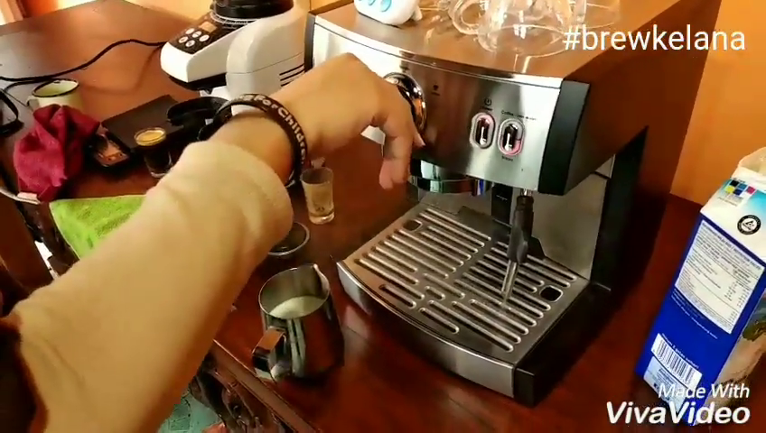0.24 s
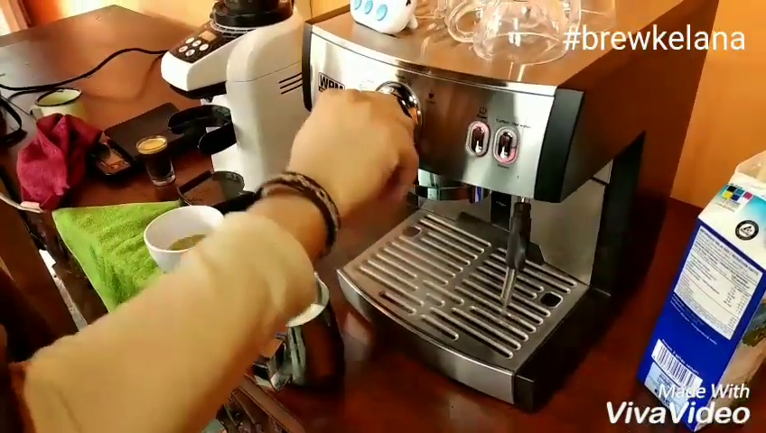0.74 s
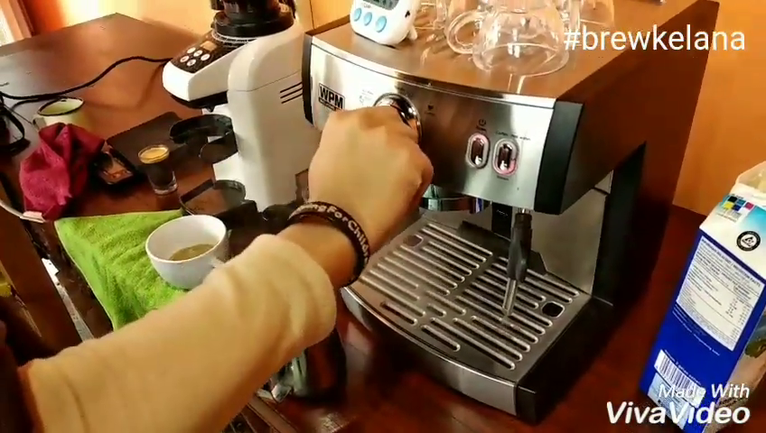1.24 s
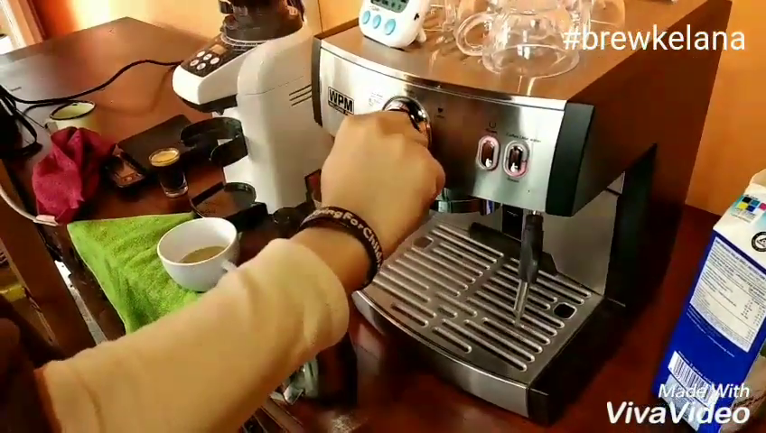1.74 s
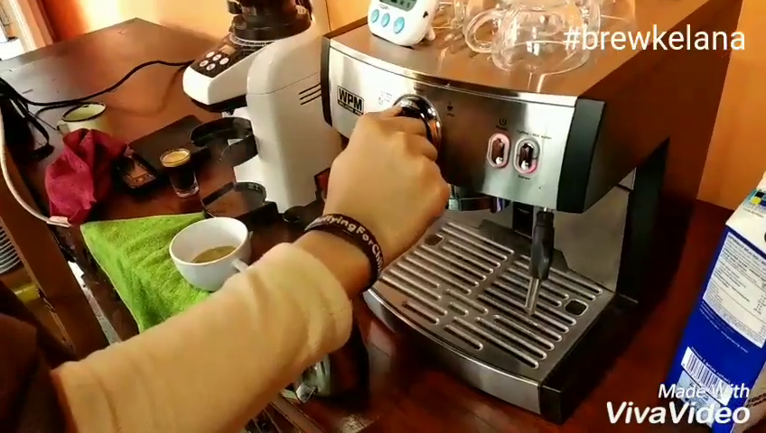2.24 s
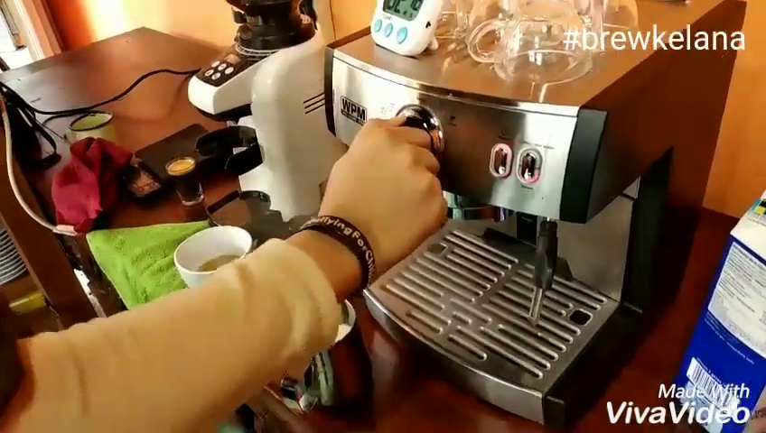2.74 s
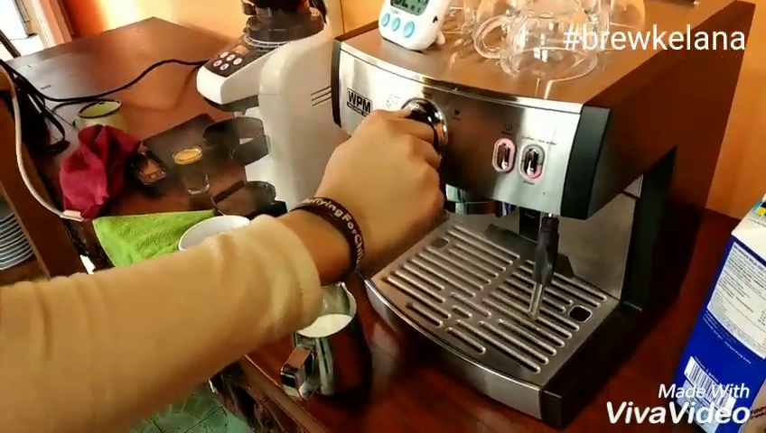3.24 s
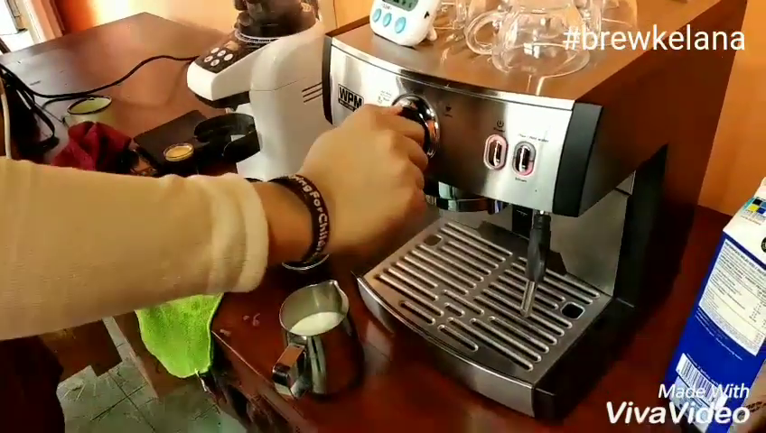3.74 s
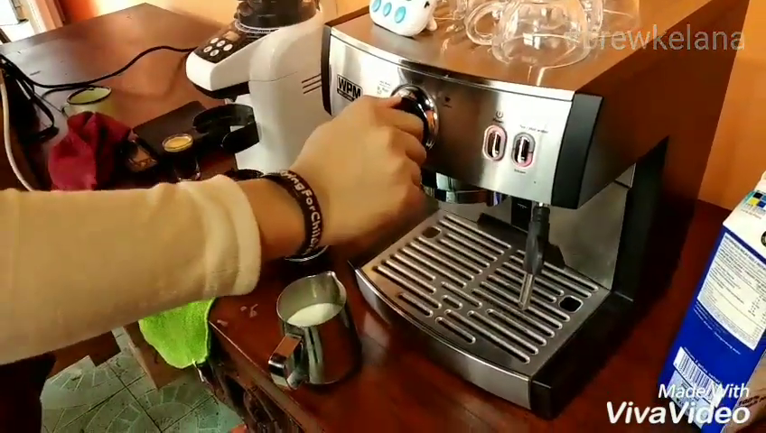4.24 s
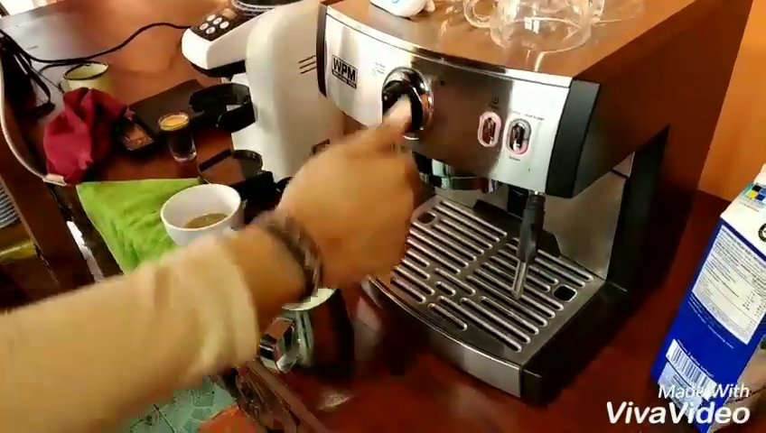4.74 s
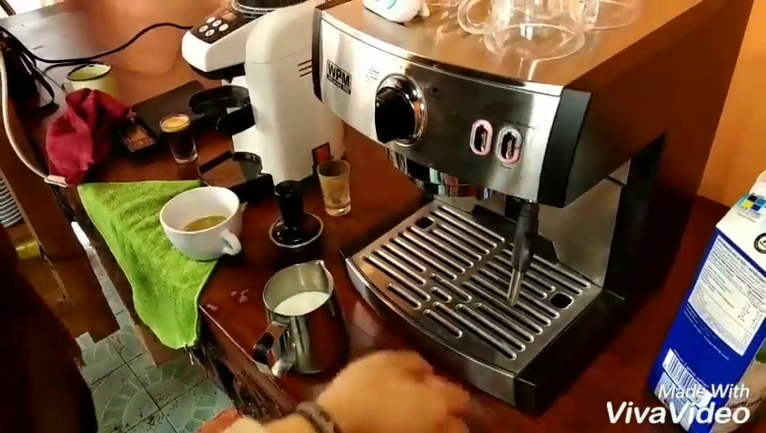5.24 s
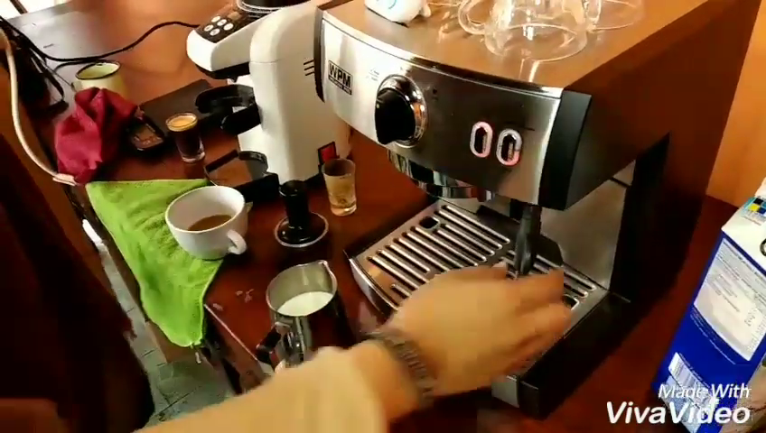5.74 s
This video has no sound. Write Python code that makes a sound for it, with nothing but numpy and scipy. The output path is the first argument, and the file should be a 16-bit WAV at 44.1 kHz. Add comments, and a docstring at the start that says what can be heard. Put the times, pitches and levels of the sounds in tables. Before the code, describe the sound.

Close stereo pickup in a small room: an espresso machine is already hissing loudly, dry and bright, over a low pulsing hum. A faint double knock comes before the knob turns and the hiss drops. A fuller jet bursts in with spluttering water, clears to rushing steam, and fades quickly. The hum runs down, leaving soft room noise and dull low rumbles.

```python
"""Small room: an espresso machine blows off steam over the low hum of a distant engine. A dry, bright jet of
flickering noise hisses until the knob turns at 2 s; a fuller jet then splutters with water, clears and dies
away as the pressure falls. The hum, harmonics of a slow beat, runs down into dull noise. Shaped room noise and
soft low rumbles, sliding tones mixed with rough noise, remain."""
import sys
import numpy as np
from scipy import signal
from scipy.fft import rfft, irfft, next_fast_len
from scipy.io import wavfile
from scipy.ndimage import uniform_filter1d

SR = 44100
rng = np.random.default_rng(int(sys.argv[2]) if len(sys.argv) > 2 else 0)


def store_pcm(level_fs):
    """Save levels as 16-bit WAV."""
    pcm = np.round(np.clip(level_fs, -1, 1) * 32767).astype(np.int16)
    wavfile.write(sys.argv[1], SR, np.atleast_2d(pcm).T)


N = 263739
TIME = np.arange(N) / SR
HZ = np.maximum(np.arange(N // 2 + 1) * SR / N, 1)

# Room noise: (frequency [Hz], relative density [dB/Hz])
ROOM_SPECTRUM = [(30, -12), (70, -17), (150, -22), (290, -22), (345, -24), (410, -12.5), (700, -11),
                 (1400, -13), (2080, -9), (2600, -14), (4600, -24.5), (6500, -27.5), (9000, -24.5),
                 (12500, -35), (15000, -40)]
# Faint room resonances: (frequency [Hz], width [Hz], height [dB], left minus right [dB])
ROOM_RESONANCES = [(410, 43, 7.5, 2), (1750, 1600, -2.5, 6), (2060, 110, 2, 8)]
# Default likeness of noise at the two ears: (frequency [Hz], correlation [-1..1])
EAR_LIKENESS = [(60, .93), (400, .93), (950, .88), (1500, .55), (2700, .6), (4000, .45), (6000, .2),
                (10000, .05)]
# Hum harmonics: (multiple of the beat [1], level [dB])
HUM_HARMONICS = [(2, -4), (3, -1.5), (4, -3), (5, 2), (6, -0.5), (7, -6), (8, -19), (11, -13)]
# Passing swells of single harmonics: (start [s], length [s], multiple [1], rise [dB])
HUM_SWELLS = [(-.1, 0.83, 4, 9.5), (-.1, 0.56, 7, 6.5), (-.1, 0.82, 11, 5), (1.17, 0.24, 5, 4.5),
              (1.58, 0.33, 5, 5.5), (1.88, 0.11, 6, 12), (2.702, 0.18, 2, 11.5), (3.032, 0.16, 5, 5)]
# Rumble under the hum: (frequency [Hz], relative density [dB/Hz])
RUMBLE_SPECTRUM = [(20, -24), (40, -11), (70, -5.5), (130, 4.5), (200, -3.5), (270, -7), (400, -14.5),
                   (800, -70)]
# Dry jet, broad: (frequency [Hz], relative density [dB/Hz])
DRY_SPECTRUM = [(40, -36), (120, -5.5), (300, -13.5), (380, -16), (520, -30), (1300, -12), (1800, -6),
                (3000, 1), (4700, -5), (6500, -4), (8800, -0.5), (12000, -4.5), (15000, -6.5)]
# Nozzle and surrounding steel: (frequency [Hz], width [Hz], height [dB], left minus right [dB])
DRY_RESONANCES = [(756, 56, 9, 1), (986, 150, 8, 0), (1328, 110, -3, -12), (1487, 64, -6.5, -15),
                  (1625, 830, 0.9, 11), (1706, 250, 5.5, -6), (2100, 200, 3, -6), (2435, 310, 2.5, 10),
                  (2730, 117, -6.5, -5), (3036, 110, -8, 8), (4160, 530, 5, 3), (4560, 1000, -3.5, 4.5),
                  (5060, 200, 7, -9), (5440, 620, -0.4, 7), (6400, 710, 2.5, -9.5), (6420, 210, -7, 11),
                  (7050, 310, 1, 14), (7200, 200, -8, -2), (7960, 1660, 2.5, -5.2)]
# Dry jet at the two ears, negative = opposite phase: (frequency [Hz], correlation [-1..1])
DRY_LIKENESS = [(400, .9), (1000, .75), (1400, -.1), (1650, .55), (1850, -.15), (2080, .6), (2280, .35),
                (2550, .92), (2850, .85), (3450, -.1), (4000, -.45), (4350, .2), (4800, -.3), (5950, .35),
                (6850, -.35), (7200, 0)]
# Hollows in the middle of the dry jet: (frequency [Hz], width [Hz], height [dB])
DRY_HOLLOWS = [(3480, 130, -8), (4770, 150, -7)]
# Bumps on the knob: (time [s], level [dB])
KNOCKS = [(1.371, -43), (1.39, -37.5)]
# Casing modes: (frequency [Hz], relative level [dB], t60 [s])
CASING_MODES = [(780, -3, 0.16), (970, 5, 0.12)]
# Clear blow-off, broad: (frequency [Hz], relative density [dB/Hz])
BLOW_SPECTRUM = [(40, -60), (120, -26), (300, -28.5), (550, -30.5), (900, -0.5), (1700, -17), (3000, -8.5),
                 (6000, 1), (9000, -14.5), (10900, -10.5), (12200, -30), (15000, -33)]
# Outlet and drip tray: (frequency [Hz], width [Hz], height [dB], left minus right [dB])
BLOW_RESONANCES = [(426, 84, 8, -11), (862, 157, -18, -12), (1106, 165, -13, -8), (1380, 200, -2, 5),
                   (1540, 71, -11, -16), (1671, 334, 12.5, 5.5), (2080, 295, 8, 6), (2630, 160, 1.5, -3),
                   (2835, 130, 6, 11), (2920, 300, -6.5, 5), (4174, 470, -9.5, 4), (4230, 470, 2.5, 0.5),
                   (4400, 91, 4, 4.5), (5144, 480, -10.5, -1), (5760, 410, -7.5, -1), (6150, 340, -2.5, 3),
                   (6580, 810, -11.5, -4), (6800, 234, -13, 0.6), (7140, 740, -3, -15), (7660, 370, -8, -8),
                   (8700, 400, 4.5, -12), (9740, 250, 4.5, -8)]
# Blow-off at the two ears, negative = opposite phase: (frequency [Hz], correlation [-1..1])
BLOW_LIKENESS = [(400, .85), (980, .85), (1300, -.4), (1600, .15), (1880, -.3), (2150, .65), (2450, .15),
                 (3150, 0), (3470, -.7), (3680, .1), (3900, -.8), (4060, -.98), (4300, -.1), (5200, -.3),
                 (6300, .1), (6650, -.45), (7000, .2), (9000, .05)]
# Hollows in the middle of the clear blow-off: (frequency [Hz], width [Hz], height [dB])
BLOW_HOLLOWS = [(3450, 90, -5), (4050, 150, -11), (5200, 140, -5), (6730, 180, -6)]
# Wet jet, broad: (frequency [Hz], relative density [dB/Hz])
WET_SPECTRUM = [(100, -27), (300, -22), (750, -2), (1200, -7), (2200, -3), (3000, 3), (4000, -3),
                (4900, -27), (6600, 5.5), (8000, 9), (10500, 8.5), (12200, -0.5), (15000, -3.5)]
# Outlet carrying water: (frequency [Hz], width [Hz], height [dB], left minus right [dB])
WET_RESONANCES = [(2200, 120, 9.5, 5), (2610, 230, -16, 8), (2950, 190, 6.5, 4), (3860, 190, -18, 0)]
# Last weak steam, no longer ringing the metal: (frequency [Hz], relative density [dB/Hz])
WEAK_SPECTRUM = [(300, -20), (700, 3.5), (1300, -2), (2100, 6), (4500, 0), (5600, -9), (9000, 1),
                 (11000, -20), (12500, -7), (15000, -15)]
# Spluttering water: (frequency [Hz], relative density [dB/Hz])
SPLUTTER_SPECTRUM = [(60, -32), (160, -2), (250, -3), (330, 4.5), (520, -8), (730, 4), (1100, -30),
                     (3000, -27), (15000, -62)]
# Water gurgling in the steam: (start [s], length [s], centre [Hz], half-width [octaves], initial level [dB])
GURGLES = [(2.283, 0.06, 300, 0.5, -31), (2.39, 0.047, 340, 0.24, -31), (2.525, .04, 520, .5, -34.5),
           (2.85, 0.045, 435, 0.17, -36)]
# Soft low rumbles: (start [s], length [s], first pitch [Hz], last pitch [Hz], initial level [dB])
LOW_RUMBLES = [(4.796, .022, 215, 200, -40), (4.869, 0.03, 115, 105, -37), (4.905, 0.044, 110, 100, -36.5),
               (4.956, .025, 129, 130, -40), (4.986, 0.062, 139.5, 144, -46),
               (5.063, 0.052, 151.5, 164, -41), (5.145, 0.057, 169, 136, -46.5),
               (5.318, 0.037, 135.7, 120, -36.5), (5.35, 0.042, 175, 155, -40.5),
               (5.409, 0.021, 96.7, 95, -37), (5.435, 0.023, 107.4, 121, -33),
               (5.464, 0.06, 128.9, 122, -40), (5.62, .018, 222, 220, -50), (5.661, 0.053, 194, 205, -46),
               (5.689, 0.041, 140, 100, -44), (5.803, 0.07, 131, 123, -43), (5.878, 0.085, 122.5, 120, -38),
               (5.938, 0.067, 128.7, 122, -33)]

# Stereo and top end: bass lags at the right ear, treble is scattered
RIGHT_LAG_S, LAG_FADES_HZ, CUTOFF_HZ = 0.0001, 1600, 15250
ROOM_DB = -49
# Hum: fades slowly, then slows, swells and roughens
HUM_BEAT_HZ, HUM_DB, HUM_FADE_DB_PER_S, HUM_SWELL_EDGE_S = 32.47, -38.5, 2, 0.023
HUM_SLOWS_S, HUM_SLOWS_HZ_PER_S, HUM_ENDS_S = 3.95, 6.9, 4.87
HUM_TONAL_SHARE, HUM_ROUGHENS_S, RUN_DOWN_SWELL_DB = 0.85, 0.68, 4.5
# Dry jet: sags with boiler pressure, throttled as the knob turns, then a thin, bright leak
DRY_DB, DRY_SAG_DB_PER_S, DRY_TILT_DB_PER_OCTAVE = -20, 0.7, 0.47
KNOB_TURNS_S, THROTTLE_S = 1.951, 0.12
THROTTLE_DROP_DB, THROTTLE_DULLS_DB_PER_OCTAVE = 7.5, 2
LEAK_DROP_DB, LEAK_BRIGHTENS_DB_PER_OCTAVE = 21, 4
# Nozzle whistle; level relative to the dry jet, rise and waver as shares of pitch
WHISTLE_HZ, WHISTLE_WIDTH_HZ, WHISTLE_DB, WHISTLE_PAN_DB = 2480, 300, -12, 3.5
WHISTLE_RISE, WHISTLE_WAVER, WHISTLE_WAVER_HZ, WHISTLE_FLUTTER_DB = 0.0376, 0.014, 26, 2.0
# Valve: nozzle to blow-off, then shut for good
SWITCH_S, SWITCH_TAKES_S = 2.215, 0.14
SHUT_S, SHUT_TAKES_S = 4.62, 0.24
# Blow-off: sinks slowly, ever faster once the boiler runs empty; swings left
BLOW_DB, BLOW_SAG_DB_PER_S = -15.5, 3
EMPTY_S, EMPTY_KNEE_S, EMPTY_DB_PER_S = 4.41, 0.077, 69.5
BLOW_TILT_DB_PER_OCTAVE, WATER_DULLS_DB_PER_OCTAVE = 0.27, 5
EMPTY_DULLS_DB_PER_OCTAVE_PER_DB = 0.1
BLOW_PAN_DB, BLOW_PAN_DB_PER_S = -0.3, 2
WEAK_AFTER_DB = 32  # fall at which only weak steam is left
GUTTER_DB, GUTTER_HZ = 1.3, 16
# Water: a full slug, then a trickle; wet share is of the jet's power
WATER_OUT_S, WATER_OUT_TAKES_S, TRICKLE_SHARE, TRICKLE_DECAY_S = 2.7, 0.071, 0.9, 0.5
WET_POWER_SHARE = 0.62
SPLUTTER_DB, SPLUTTER_SAG_DB_PER_S, SPLUTTER_WATER_EXPONENT = -32, 6.5, 1.9
CHOKE_S, CHOKE_LASTS_S, CHOKE_DB = 2.354, 0.033, 3
# Gurgles and low rumbles
SWELL_EDGE_S, SWELL_SAG_DB_PER_S = 0.0055, 24
THROB_WOBBLE_OCTAVES, THROB_SHAKE_DB, THROB_ROUGH_SHARE, THROB_LAG_S = 0.1, 1.6, 0.16, 0.00025


def from_db(db):
    """Decibels to gain."""
    return 10 ** (np.asarray(db) / 20)


def rms_one(x):
    """Scale to unit power."""
    return x / np.sqrt(np.mean(x ** 2) + 1e-20)


def ramp(start_s, length_s):
    """Even rise from zero to one."""
    return np.clip((TIME - start_s) / length_s, 0, 1)


def since(start_s):
    """Seconds gone by since a moment, zero before it."""
    return np.maximum(TIME - start_s, 0)


def gate(start_s, end_s, edge_s):
    """One between start and end, with soft edges."""
    opening = (1 + np.tanh((TIME - start_s) / edge_s)) / 2
    closing = (1 + np.tanh((end_s - TIME) / edge_s)) / 2
    return opening * closing


def drift(corner_hz):
    """Slow random signal of rms 1: noise through two equal poles, drawn at every 40th sample."""
    step = 40
    pole = np.exp(-2 * np.pi * corner_hz * step / SR)
    noise = rng.standard_normal(N // step + 2002)
    slow = signal.lfilter([1], [1, -2 * pole, pole * pole], noise)[2000:]  # settled part
    return np.interp(np.arange(N) / step, np.arange(len(slow)), rms_one(slow))


def at_hz(points, hz):
    """Read a spectrum on a log-frequency axis."""
    f, value = np.transpose(points)
    return np.interp(np.log(hz), np.log(f), value)


def colour(x, db):
    """Filter by a response given in dB on the HZ grid."""
    size = next_fast_len(N, True)
    grid = np.arange(size // 2 + 1) * SR / size
    gain = np.array([np.interp(grid, HZ, from_db(row)) for row in np.atleast_2d(db)])
    return irfft(rfft(x, size) * gain, size)[:, :N]


def stereo_noise(db, likeness=EAR_LIKENESS):
    """Coloured noise of rms 1, partly alike at both ears, its bass later at the right."""
    alike = np.clip(at_hz(likeness, HZ), -0.98, 0.98)
    mid_side_db = 10 * np.log10([1 + alike, 1 - alike])
    mid, side = colour(rng.standard_normal((2, N)), mid_side_db)
    lag_s = RIGHT_LAG_S / (1 + (HZ / LAG_FADES_HZ) ** 4)
    right = irfft(rfft(mid - side) * np.exp(-2j * np.pi * HZ * lag_s), N)
    return rms_one(colour(np.array([mid + side, right]), db))


def response(spectrum, resonances):
    """Broad spectrum plus bell-shaped peaks and dips, of different height at each ear."""
    db = at_hz(spectrum, HZ) * np.ones((2, 1))
    for hz, width_hz, height_db, pan_db in resonances:
        bell = 0.5 ** ((2 * (HZ - hz) / width_hz) ** 2)
        db = db + (height_db + np.array([[pan_db], [-pan_db]]) / 2) * bell
    return db


def room_noise():
    """Steady noise shaped by the room's faint resonances."""
    return from_db(ROOM_DB) * stereo_noise(response(ROOM_SPECTRUM, ROOM_RESONANCES))


def hum():
    """Harmonics of a slow beat swell in turn, offset between the ears; they run down into a dull rumble."""
    run_down = ramp(HUM_SLOWS_S, HUM_ROUGHENS_S)
    level_db = HUM_DB - HUM_FADE_DB_PER_S * TIME + RUN_DOWN_SWELL_DB * run_down
    beat_hz = HUM_BEAT_HZ * (1 + 0.00422 * drift(2.3)) - HUM_SLOWS_HZ_PER_S * since(HUM_SLOWS_S)
    phase = 2 * np.pi * np.cumsum(beat_hz) / SR
    lines, power = 0, 0
    for multiple, db in HUM_HARMONICS:
        swell_db = 0
        for start_s, length_s, swelling, rise_db in HUM_SWELLS:
            if swelling == multiple:
                swell_db = swell_db + rise_db * gate(start_s, start_s + length_s, HUM_SWELL_EDGE_S)
        waver = from_db(1.8 * drift(2.5))
        ear_offsets = 0.36 * rng.standard_normal((2, 1))
        offsets = rng.uniform(0, 2 * np.pi) + ear_offsets + 0.33 * drift(3.0)
        lines = lines + from_db(db + swell_db) * waver * np.cos(multiple * phase + offsets)
        power += from_db(db) ** 2 / 2
    tonal = HUM_TONAL_SHARE * (1 - 0.67 * run_down)
    rumble = stereo_noise(at_hz(RUMBLE_SPECTRUM, HZ))
    body = np.sqrt(tonal / power) * lines + np.sqrt(1 - tonal) * rumble
    return from_db(level_db) * gate(-1, HUM_ENDS_S, edge_s=0.0116) * body * from_db([[-1.0], [0.9]])


def jet(noise, tilt_db_per_octave, eddy_db):
    """Turbulent steam: eddies make each band flicker by itself, and the flow tilts the treble."""
    centres_hz = np.geomspace(500, 15000, 12)
    out = 0
    for k, hz in enumerate(centres_hz):
        share = np.interp(np.log(HZ), np.log(centres_hz), np.arange(len(centres_hz)) == k)
        band = colour(noise, 20 * np.log10(share + 1e-9))
        out = out + band * from_db(tilt_db_per_octave * np.log2(hz / 4500) + eddy_db * drift(16))
    return out


def shifting(x, depth_db, patch_hz, patch_s):
    """The plume wanders, so patches of its treble swell and fade, each by itself."""
    size = 512
    hz, _, frames = signal.stft(x, SR, nperseg=size)
    field = rng.standard_normal(frames.shape[1:])
    spans = [(0, patch_hz * size / SR), (1, patch_s * 2 * SR / size)]
    for axis, span in 2 * spans:  # smoothed twice
        field = uniform_filter1d(field, max(round(span), 1), axis=axis, mode="wrap")
    treble = np.clip(hz / 3500, 0, 1)[:, None]
    gain = from_db(depth_db * treble * rms_one(field - field.mean(axis=1, keepdims=True)))
    return signal.istft(frames * rms_one(gain), SR, nperseg=size)[1][:, :N]


def moving_echoes(x, strength, sway_s, count=6):
    """Arm and steel panels throw back the treble; as the paths sway, ripples wander through the hiss."""
    treble = colour(x, -10 * np.log10(1 + (1400 / HZ) ** 4))
    fine = signal.resample_poly(treble, 4, 1, axis=1)
    fine_time = np.arange(fine.shape[1]) / (4 * SR)
    direct = 1 / np.sqrt(1 + count * strength ** 2)  # keeps the power
    out = x - treble * (1 - direct)
    for ear in range(2):
        for path_s in np.geomspace(0.0025, 0.011, count) * rng.uniform(0.8, 1.2, count):
            arrival = TIME - path_s - sway_s * drift(0.59)
            out[ear] += direct * strength * np.interp(arrival, fine_time, fine[ear], left=0)
    return out


def hollowed(x, hollows):
    """Narrow bands in which the part common to both ears cancels."""
    common = x.mean(axis=0)
    db = sum(height_db * 0.5 ** ((2 * (HZ - hz) / width_hz) ** 2) for hz, width_hz, height_db in hollows)
    return x - common + colour(common, db)


def wandering(x, bend):
    """All resonances of a noise slide together by the share `bend` of their pitch."""
    fine = signal.resample_poly(x, 4, 1, axis=1)
    place = 4 * (np.cumsum(1 + bend) % N)
    return np.array([np.interp(place, np.arange(len(ear)), ear) for ear in fine])


def spitting(per_s, depth, decay_s):
    """Droplets pass at random, each a short flare of the hiss; a gain of rms 1."""
    drops = np.minimum(rng.exponential(1, N), 2) * (rng.random(N) < per_s / SR)
    flares = signal.lfilter([1], [1, -np.exp(-1 / (decay_s * SR))], drops + 1e-18)
    return rms_one(1 + depth * flares)


def valve_open():
    """One until the knob closes the valve."""
    return 1 - ramp(SHUT_S, SHUT_TAKES_S)


def whistle():
    """A broad, rough band of hiss at the nozzle's lip that flutters, and rises as the knob turns."""
    band_db = -10 * np.log10(1 + (2 * (HZ - WHISTLE_HZ) / WHISTLE_WIDTH_HZ) ** 6)
    band = stereo_noise(band_db, DRY_LIKENESS)
    rise = WHISTLE_RISE * ramp(KNOB_TURNS_S - THROTTLE_S / 2, THROTTLE_S)
    bend = WHISTLE_WAVER * drift(WHISTLE_WAVER_HZ) + rise
    flutter = from_db(WHISTLE_FLUTTER_DB * drift(WHISTLE_WAVER_HZ))
    sides_db = np.array([[0.5], [-0.5]]) * WHISTLE_PAN_DB
    return from_db(WHISTLE_DB + sides_db) * rms_one(flutter * wandering(band, bend))


def dry_jet():
    """Open nozzle: bright steam surges a little, is throttled as the knob turns and shrinks to a leak."""
    throttled, switched = ramp(KNOB_TURNS_S, THROTTLE_S), ramp(SWITCH_S, SWITCH_TAKES_S)
    level_db = DRY_DB - DRY_SAG_DB_PER_S * TIME - THROTTLE_DROP_DB * throttled - LEAK_DROP_DB * switched
    tilt = DRY_TILT_DB_PER_OCTAVE - THROTTLE_DULLS_DB_PER_OCTAVE * throttled
    tilt = tilt + LEAK_BRIGHTENS_DB_PER_OCTAVE * switched
    steam = stereo_noise(response(DRY_SPECTRUM, DRY_RESONANCES), DRY_LIKENESS)
    hiss = jet(steam, tilt, eddy_db=0.9)
    hiss = shifting(hiss, depth_db=1.6, patch_hz=350, patch_s=0.12)
    hiss = moving_echoes(hiss, strength=0.33, sway_s=0.00012)
    hiss = hollowed(hiss, DRY_HOLLOWS)
    hiss = wandering(hiss, 0.011 * drift(2.5)) + (1 - throttled) * whistle()
    hiss = hiss * spitting(per_s=240, depth=0.29, decay_s=0.00066)
    surge = from_db(0.3 * drift(11))
    return from_db(level_db) * valve_open() * surge * hiss


def knocks():
    """The hand bumps the knob, and the casing's modes ring briefly."""
    out = 0
    for start_s, level_db in KNOCKS:
        age_s = since(start_s)
        for hz, mode_db, t60_s in CASING_MODES:
            strike_db = level_db + mode_db + 2 * rng.standard_normal()
            decay_db = 60 * np.minimum(age_s / t60_s, 2)
            out = out + from_db(strike_db - decay_db) * np.sin(2 * np.pi * hz * age_s)
    return out


def water_left():
    """Water in the blow-off, 0-1: a full slug, then a dying trickle."""
    trickle = TRICKLE_SHARE * np.exp(-since(WATER_OUT_S) / TRICKLE_DECAY_S)
    return 1 - (1 - trickle) * ramp(WATER_OUT_S, WATER_OUT_TAKES_S)


def blow_off():
    """The boiler vents toward the drip tray: wet, then clear, then weak as its pressure falls."""
    emptied_db = EMPTY_DB_PER_S * EMPTY_KNEE_S * np.logaddexp(0, (TIME - EMPTY_S) / EMPTY_KNEE_S)
    level_db = BLOW_DB - BLOW_SAG_DB_PER_S * since(SWITCH_S) - emptied_db
    water = water_left()
    wet = WET_POWER_SHARE * water
    weak = np.clip(emptied_db / WEAK_AFTER_DB, 0, 1)
    tilt = BLOW_TILT_DB_PER_OCTAVE - WATER_DULLS_DB_PER_OCTAVE * wet
    tilt = tilt - EMPTY_DULLS_DB_PER_OCTAVE_PER_DB * emptied_db
    clear_steam = stereo_noise(response(BLOW_SPECTRUM, BLOW_RESONANCES), BLOW_LIKENESS)
    wet_steam = stereo_noise(response(WET_SPECTRUM, WET_RESONANCES))
    weak_steam = stereo_noise(at_hz(WEAK_SPECTRUM, HZ))
    steam = np.sqrt(1 - wet) * clear_steam + np.sqrt(wet) * wet_steam
    steam = np.sqrt(1 - weak) * steam + np.sqrt(weak) * weak_steam
    hiss = jet(steam, tilt, eddy_db=0.8)
    hiss = hiss * spitting(per_s=150, depth=0.19, decay_s=0.0041)
    hiss = shifting(hiss, depth_db=1.9, patch_hz=300, patch_s=0.25)
    hiss = moving_echoes(hiss, strength=0.28, sway_s=0.00007)
    hiss = water * hiss + (1 - water) * hollowed(hiss, BLOW_HOLLOWS)
    guttering = from_db(GUTTER_DB * weak * drift(GUTTER_HZ))
    hiss = wandering(hiss, 0.006 * drift(3)) * guttering
    pan_db = BLOW_PAN_DB + BLOW_PAN_DB_PER_S * since(SWITCH_S)
    sides = from_db(np.array([[0.5], [-0.5]]) * pan_db)
    return from_db(level_db) * ramp(SWITCH_S, SWITCH_TAKES_S) * valve_open() * sides * hiss


def splutter():
    """Condensed water is driven out first, in dense, low, wet bursts."""
    flow = ramp(SWITCH_S, 0.039) * water_left() ** SPLUTTER_WATER_EXPONENT
    level_db = SPLUTTER_DB - SPLUTTER_SAG_DB_PER_S * since(SWITCH_S)
    bursts = spitting(per_s=170, depth=0.37, decay_s=0.0062)
    water_noise = stereo_noise(at_hz(SPLUTTER_SPECTRUM, HZ)) * from_db([[-1.8], [1.8]])
    return from_db(level_db) * flow * bursts * water_noise


def swell_envelope(start_s, length_s, level_db):
    """Quick soft rise, sag and stop."""
    sagging_db = level_db - SWELL_SAG_DB_PER_S * since(start_s)
    return from_db(sagging_db) * gate(start_s, start_s + length_s, SWELL_EDGE_S)


def gurgles():
    """Water gurgles in the steam: short, soft bursts, each a narrow band of evened noise."""
    noise, out = stereo_noise(np.zeros(len(HZ))), 0
    for start_s, length_s, hz, half_width_octaves, level_db in GURGLES:
        skirt_db = -6 * np.abs(np.log2(HZ / hz) / half_width_octaves) ** 1.7
        band = colour(noise, skirt_db)
        local_power = uniform_filter1d(np.mean(band ** 2, axis=0), size=SR // 25)
        even = band / np.sqrt(local_power + 1e-20)
        out = out + swell_envelope(start_s, length_s, level_db) * even
    return out


def choke():
    """A slug of water chokes the outlet for a moment; a gain."""
    return from_db(-CHOKE_DB * gate(CHOKE_S, CHOKE_S + CHOKE_LASTS_S, SWELL_EDGE_S))


def low_rumbles():
    """Dull, rough throbs of a few cycles slide in pitch, later at the right ear."""
    wobble = 2 ** (THROB_WOBBLE_OCTAVES * drift(45))
    shake = from_db(THROB_SHAKE_DB * drift(45))
    rough_db = at_hz(RUMBLE_SPECTRUM, HZ) - 10 * np.log10(1 + (HZ / 250) ** 8)
    rough = rms_one(colour(rng.standard_normal(N), rough_db)[0])
    phases = rng.uniform(0, 2 * np.pi, len(LOW_RUMBLES))
    out = 0
    for (start_s, length_s, first_hz, last_hz, level_db), phase in zip(LOW_RUMBLES, phases):
        hz = wobble * (first_hz + (last_hz - first_hz) * ramp(start_s, length_s))
        throb = np.sqrt(2) * shake * np.sin(phase + 2 * np.pi * np.cumsum(hz) / SR)
        body = np.sqrt(1 - THROB_ROUGH_SHARE) * throb + np.sqrt(THROB_ROUGH_SHARE) * rough
        out = out + swell_envelope(start_s, length_s, level_db) * body
    return np.array([out, np.roll(out, round(THROB_LAG_S * SR))])


def scene():
    """Room, hum, both jets, knocks, water and low rumbles."""
    outlet = choke() * (blow_off() + splutter()) + gurgles()
    return room_noise() + hum() + dry_jet() + knocks() + outlet + low_rumbles()


def record(dry):
    """Steep low-pass at the top."""
    low_pass = signal.ellip(12, 0.1, 90, CUTOFF_HZ, fs=SR, output="sos")
    return signal.sosfilt(low_pass, dry)


dry = scene()
out = record(dry)
store_pcm(out)
```